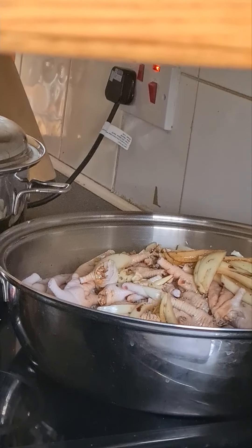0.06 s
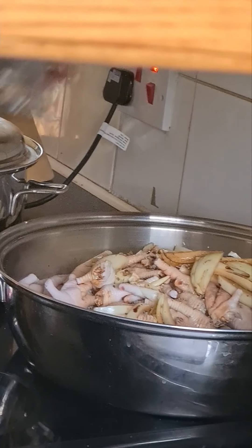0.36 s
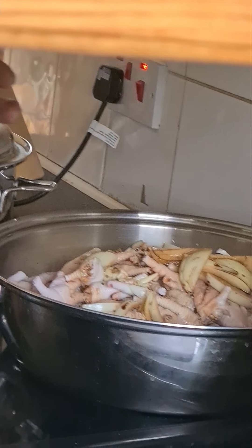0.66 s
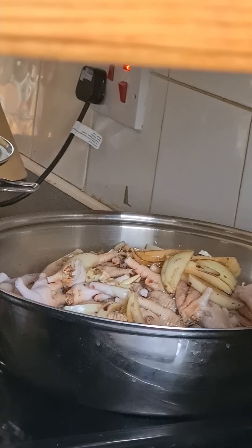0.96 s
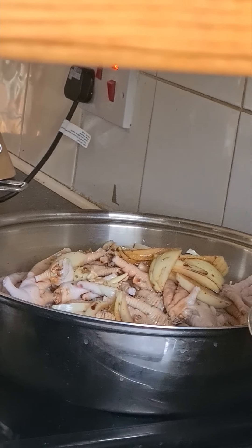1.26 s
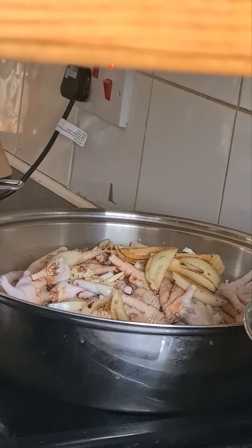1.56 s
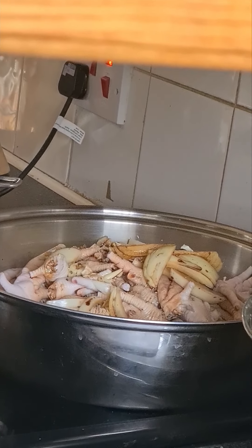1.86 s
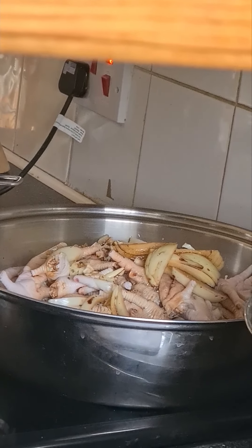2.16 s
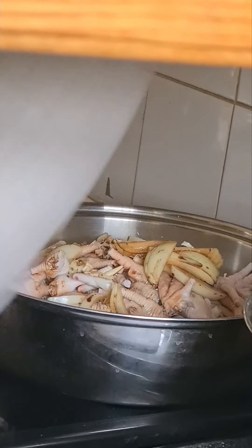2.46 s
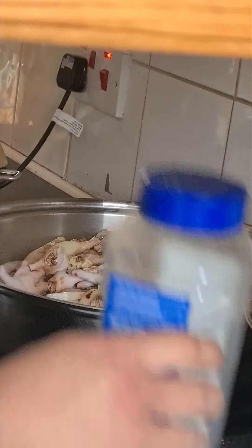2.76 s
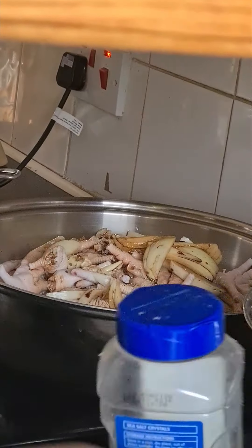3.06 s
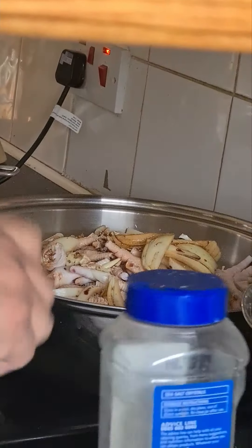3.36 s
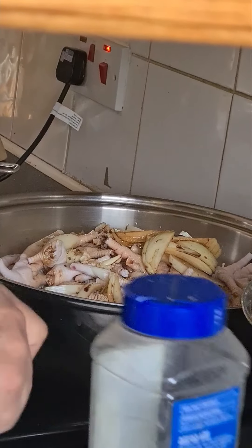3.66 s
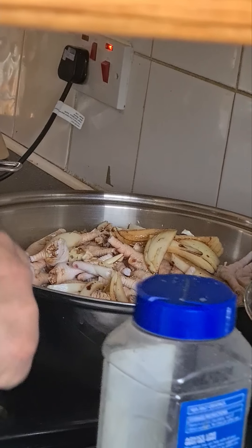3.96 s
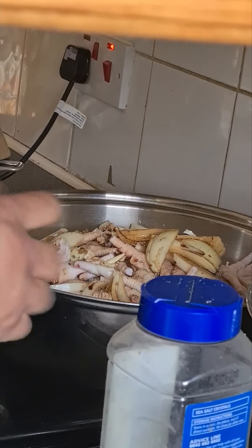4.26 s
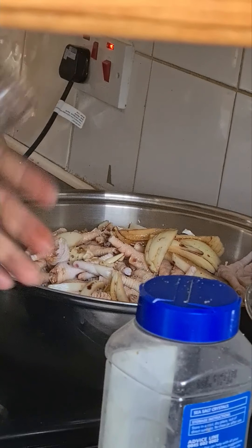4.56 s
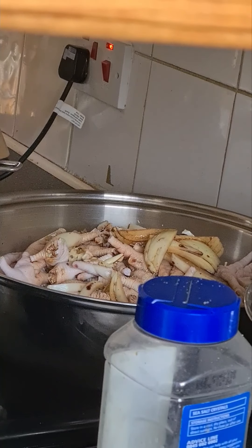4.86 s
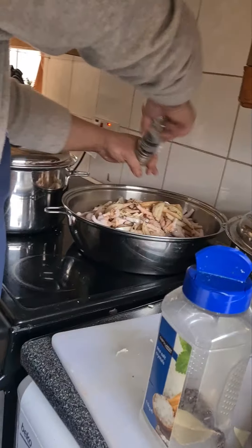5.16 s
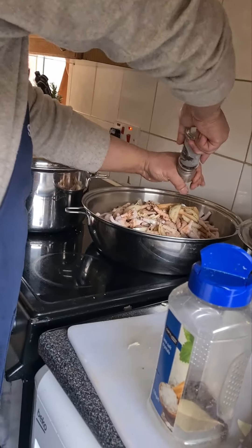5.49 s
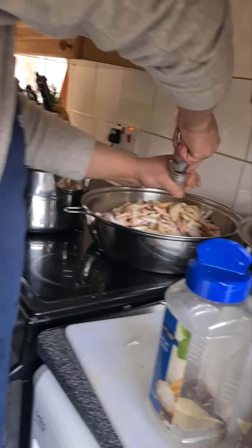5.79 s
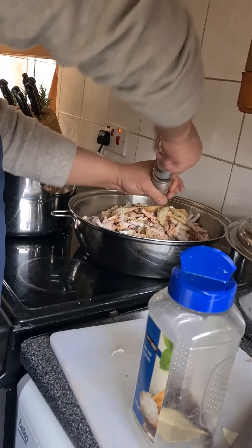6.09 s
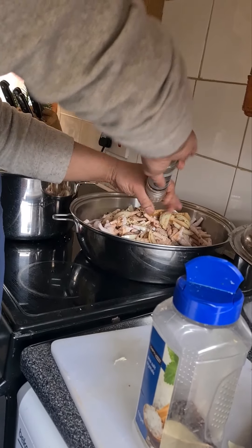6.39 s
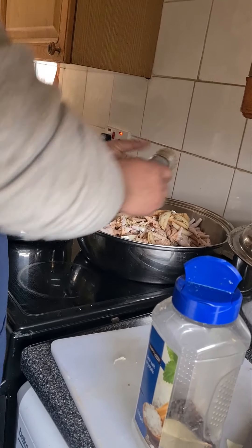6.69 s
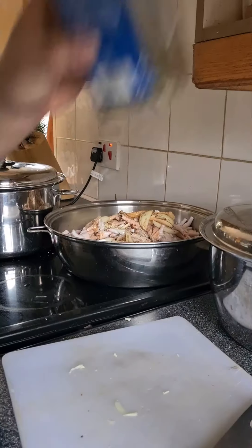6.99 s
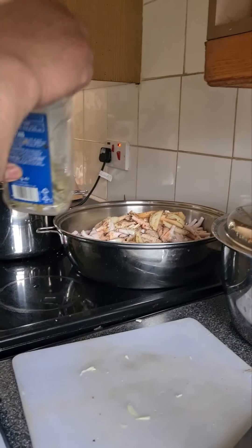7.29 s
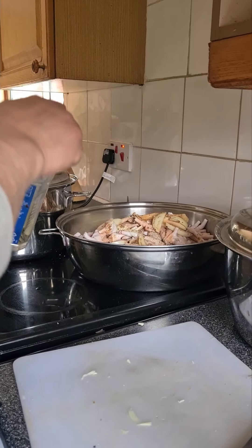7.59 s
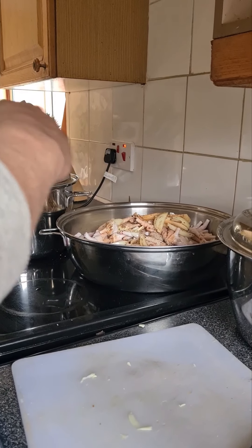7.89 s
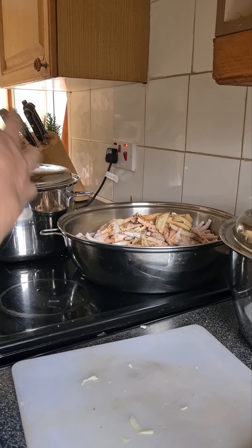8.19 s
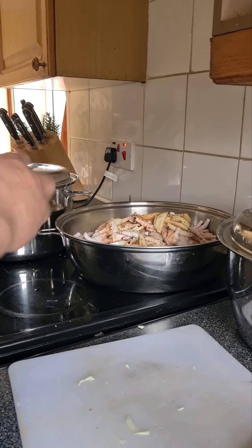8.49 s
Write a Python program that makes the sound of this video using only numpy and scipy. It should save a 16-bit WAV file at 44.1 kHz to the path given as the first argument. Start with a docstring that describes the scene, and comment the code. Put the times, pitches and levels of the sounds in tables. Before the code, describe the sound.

A faint low hum and airy hiss fill a small tiled kitchen. From about 0.7 to 1.4 seconds something is shoved along a shelf, with a hollow, sinking scrape and light bumps; more knocks come near 2.1. Salt then swishes and ticks inside a plastic jar, which lands at 3.1 with a loud thump and a burst of grains, the loudest moment. Smaller knocks follow around 3.4 and 3.9. After a lull and a soft tap, a spice mill crunches in three short, crisp twists at about 5.5, 5.8 and 6.1, while the background bass drops away. Around 6.8 to 7.2 dry herbs slide quietly in a jar with tiny clinks, followed by a faint falling squeak near 7.4. From 7.5 containers rub and knock on the counter, ending in a cluster of sharper clacks around 8.5. Everything sounds close, with a short reverberation.

```python
"""A small tiled kitchen, where food is seasoned over a low hum. Something slides along a shelf by
stick-slip friction. Salt runs in a swung plastic jar, which lands and rocks on a board, each impact
exciting its modes. Grains fracture in three twists of a spice mill, and the background bass drops away.
Dry herbs slide in a tipped jar, a faint squeak follows, and containers rub and knock as they are
put back. Reflections from tiles and cupboards add a short reverberation."""
import sys
import numpy as np
from scipy import signal
from scipy.fft import rfft, irfft
from scipy.io import wavfile

SR = 44100
rng = np.random.default_rng(int(sys.argv[2]) if len(sys.argv) > 2 else 0)


def waveform_to_disk(signal):
    """Save audio, clipped to [-1, 1], as 16-bit WAV at the path in sys.argv[1]."""
    frames = np.transpose(np.atleast_2d(signal))
    scaled = np.clip(frames, -1, 1) * 32767
    samples = np.round(scaled).astype(np.int16)
    wavfile.write(sys.argv[1], SR, samples)


N = 381024
T = np.arange(N) / SR

# Spectra of the background noise. Each row: frequency in Hz, relative density in dB.
AIR_SPECTRUM = [(60, -24.5), (110, -9.5), (200, -10.5), (310, -4), (480, -11), (900, -11.5), (1400, -13),
                (2950, -15), (4500, -24), (5500, -25), (6700, -15), (7800, -24.5), (8800, -36.5),
                (15500, -35.5)]
RUMBLE_SPECTRUM = [(12, -24), (28, -4.5), (52, -4.5), (70, -18), (120, -28.5), (250, -26), (600, -63.5)]
# Partials of an appliance's hum. Each row: frequency in Hz, relative level in dB.
HUM_PARTIALS = [(151.5, -63), (226.5, -81.5), (306, -69), (350, -80), (392, -72)]

# Shoves along the shelf. Each row: start and length in seconds, relative hollow and scratch levels in dB.
SHOVES = [(0.749, 0.076, -44, -52), (0.808, 0.07, -38.5, -41.5), (0.917, 0.063, -36, -43.5),
          (0.967, 0.066, -35, -42.5), (1.038, 0.073, -31.5, -40), (1.155, 0.032, -24, -42),
          (1.199, 0.021, -32.5, -32.5), (1.238, 0.028, -32.5, -47), (1.317, 0.062, -31.5, -43),
          (2.028, 0.12, -50.5, -43)]
# The sinking hollow resonance. Each row: time in seconds, frequency in Hz.
SLIDE_PITCH = [(0.8, 794), (1.054, 786), (1.092, 692), (1.31, 628)]
# Spectra of the sliding friction. Each row: frequency in Hz, relative density in dB.
SLIDE_SPECTRUM = [(35, -70), (60, -8.5), (129, 10), (293, -1), (334, 13), (511, 5), (695, 7), (1000, -6),
                  (1160, 6), (1450, -1), (2000, -6), (2600, -30), (4400, -120)]
SCRATCH_SPECTRUM = [(500, -5), (1300, 7.5), (2700, 5.5), (4200, -3), (6500, -1), (8500, -12),
                    (15000, -23.5)]

# Contacts on the shelf, in handling the salt jar and then the mill, and on the counter.
# Each row: start in seconds, ring peak in dB, contact hardness as a cut-off in Hz,
# relative clack level in dB, clack decay in seconds.
SHELF_KNOCKS = [(0.845, -36, 230, -45, .02), (1.075, -29.5, 330, -26, 0.011),
                (1.336, -30, 1200, -11.5, 0.024), (1.376, -34, 1200, -15, 0.022),
                (1.99, -37, 513, -47, 0.026), (2.017, -34, 607, -47, 0.01), (2.06, -29, 300, -39, 0.039),
                (2.097, -23, 450, -35, 0.037), (2.126, -17.5, 1510, -41, 0.0052)]
HANDLING_CONTACTS = [(3.014, -37, 900, -29.5, 0.11), (3.07, -11, 1500, -5, 0.011),
                     (3.074, -6, 755, -10.5, 0.019), (3.345, -23, 795, -35.5, 0.024),
                     (3.383, -19.5, 580, -25, 0.023), (3.47, -50, 505, -41.5, 0.057),
                     (3.557, -32, 280, -32.5, 0.024), (3.616, -37.5, 398, -45, .01),
                     (3.757, -33.5, 276, -35.5, 0.027), (3.8935, -15.5, 664, -25.5, 0.022),
                     (4.028, -38, 256, -41, 0.0077), (4.098, -33, 710, -43.5, 0.007),
                     (5.215, -46, 650, -41, 0.035)]
COUNTER_KNOCKS = [(7.526, -47, 1000, -45, 0.023), (7.869, -53, 3200, -31, 0.0079),
                  (7.926, -50, 1100, -37.5, 0.028), (7.955, -23.5, 900, -29, 0.0081),
                  (8.086, -44, 900, -44, .006), (8.146, -35, 1190, -35, 0.019),
                  (8.209, -35, 1500, -29, 0.012), (8.222, -33, 1500, -26.5, 0.007),
                  (8.277, -57, 3500, -28.5, 0.0039), (8.463, -35, 1780, -21.5, 0.0052),
                  (8.47, -17, 1890, -15.5, 0.0052), (8.497, -26, 2200, -16, 0.0037),
                  (8.522, -34, 1400, -30, 0.02), (8.552, -25, 700, -28, 0.012),
                  (8.567, -16.5, 1690, -22, 0.014)]
# Modes of the struck bodies. Each row: frequency in Hz, relative level in dB, 60 dB decay time in seconds.
SHELF_MODES = [(91, -31, 0.076), (149, -19, 0.22), (243.6, -8, 0.12), (301, 0.5, 0.074), (343, -15, 0.046),
               (445.6, -10.5, 0.12), (638, -18, 0.097), (823, -9, 0.055), (828, 3, 0.076),
               (1033, -14, 0.21), (1133, -35, 0.33)]
HANDLING_MODES = [(86, -32, 0.25), (170.6, -28.5, 0.24), (239, -17, 0.19), (392, -27.5, 0.021),
                  (414, 2, 0.11), (406, -29, 0.26), (530, -26, 0.048), (787, -8.5, 0.066)]
HERB_JAR_MODES = [(2830, -4, 0.1), (4000, -4, 0.089), (5100, -16, 0.09), (5700, 8, 0.091), (7400, 5, 0.13)]
COUNTER_MODES = [(85.5, -20.5, 0.11), (156, -3.5, 0.032), (289, -8.5, 0.14), (371.6, 9.5, 0.04),
                 (719, 10.5, 0.022), (1117, -4, 0.094), (1359, 8, 0.035), (1514, -5, 0.048),
                 (1860, -7.5, 0.19)]
# Spectra of the contact noise. Each row: frequency in Hz, relative density in dB.
SHELF_CLACK = [(50, -18), (130, -33), (330, -6), (700, 4), (950, -4), (1150, 6.5), (1500, -10.5),
               (3000, -14.5), (7000, -68), (15000, -69)]
HANDLING_CLACK = [(50, -25), (110, -3.5), (190, 2), (450, 1), (800, -2), (1300, -0.5), (2300, -6),
                  (4000, -11.5), (6500, -7), (9000, -21.5), (15000, -37.5)]
COUNTER_CLACK = [(45, -32), (85, -8), (150, -12), (400, 7.5), (800, 3), (1450, 1.5), (2300, 2),
                 (3700, -7.5), (6500, -7), (9000, -16.5), (15000, -28)]

# Surges of salt in the swung jar. Each row: start in seconds, length in seconds, peak level in dB.
SALT_SURGES = [(2.239, 0.16, -29), (2.772, .035, -35.5), (2.99, 0.082, -29.5)]
# Ticks of grains and plastic, and snaps in the mill. Each row: start in seconds, level in dB,
# decay in seconds.
TICKS = [(2.677, -27, 0.0088), (2.718, -28, 0.0039), (2.776, -24.5, 0.031), (2.939, -17.5, 0.0031),
         (3.392, -30, 0.0025), (3.851, -36.5, 0.0083), (3.906, -25.5, 0.0063), (4.365, -42.5, 0.025),
         (5.217, -35.5, 0.023), (6.57, -48, 0.024), (6.708, -41, 0.011)]
MILL_SNAPS = [(5.471, -13.5, 0.0046), (5.615, -21.5, 0.021), (5.773, -14, 0.011), (5.838, -9, 0.0018),
              (5.849, -7, 0.0044), (6.16, -23, 0.0052), (6.432, -31, 0.0042)]
# Strong and faint movements of the mill. Each row: start and length in seconds, relative crush and bite
# levels in dB, fall in dB per second.
TWISTS = [(5.469, 0.029, -26, -21.5, 515.5), (5.763, 0.088, -20, -24, 649), (5.955, 0.04, -42, -53, 140),
          (6.105, 0.069, -25.5, -26, 600), (6.359, 0.076, -43.5, -48, 280)]
# Clinks of the herb jar. Each row: start in seconds, ring peak in dB, relative clack level in dB.
CLINKS = [(6.853, -66, -41), (6.924, -50, -59), (7.025, -54, -54), (7.071, -45, -46), (7.121, -52, -52),
          (7.161, -51, -52)]
# Rubs of moved containers. Each row: start in seconds, length in seconds, relative level in dB.
RUBS = [(7.535, 0.15, -52), (7.767, .17, -47), (8.16, 0.079, -48.5)]

# Spectra of the granular sounds. Each row: frequency in Hz, relative density in dB.
SALT_SPECTRUM = [(180, -45), (300, -5.5), (462, -8), (678, -3), (870, -13), (1120, 1.5), (1580, -7),
                 (1970, -2), (2840, -2), (3890, -4.5), (6300, 0.5), (12300, -18), (16000, -23)]
LANDING_SPECTRUM = [(80, -17), (150, -17.5), (240, 2), (320, -10.5), (440, 8.5), (700, -8), (1000, -5),
                    (1500, -9), (2000, -6.5), (2400, -19), (2900, -5), (4300, -16), (6500, -3),
                    (8500, -10.5), (12000, -13.5), (16000, -21.5)]
TICK_SPECTRUM = [(400, -30.5), (1500, -39.5), (3000, -9), (4300, -14), (5500, -6.5), (6900, 1.5),
                 (8500, -11.5), (11000, -14.5), (16000, -25.5)]
CRUSH_SPECTRUM = [(150, -33), (900, -11), (1250, -14.5), (2200, -13.5), (2900, -21), (3600, -25.5),
                  (5400, -13), (6400, 2), (8500, -2), (10500, -7), (13000, -8.5), (16000, -19)]
BITE_SPECTRUM = [(100, -24), (400, -4.5), (850, -23), (1250, -3), (1650, -6), (2100, -1), (2400, -8),
                 (2900, 1.5), (3600, -10), (5000, -13), (7000, -5), (16000, -30)]
SNAP_SPECTRUM = [(400, -32), (1500, -6), (2900, 5), (3600, -11), (5300, -10), (6500, 18.5), (8500, 6),
                 (11000, -1), (16000, -7.5)]
HERB_SPECTRUM = [(800, -14), (3000, -18), (5500, -18), (7600, -4.5), (9500, -15), (12500, -17),
                 (16000, -28)]
# Resonances of the vessels around the grains. Each row: frequency in Hz, width in Hz, boost in dB.
SALT_JAR_PEAKS = [(1790, 110, 13.5), (2080, 300, 10.5), (3760, 300, 11), (5070, 240, 8.5), (6040, 250, 5)]
MILL_PEAKS = [(1190, 220, 10), (2700, 150, 14), (3020, 140, 9.5), (6030, 500, 6), (7440, 133, 7),
              (8800, 82, 9.5)]
HERB_JAR_PEAKS = [(6760, 220, 7), (7570, 320, 7.5), (12800, 510, 3)]

# Likeness of the two channels. Each row: frequency in Hz, coherence from 0 to 1.
COHERENCE = [(30, 0.88), (200, 0.86), (450, 0.57), (900, 0.5), (1800, 0), (3000, 0.07), (16000, 0.027)]
# Reverberation time. Each row: frequency in Hz, 60 dB decay time in seconds.
ROOM_T60 = [(100, 0.2), (500, 0.2968), (2000, 0.32), (6000, 0.3568), (14000, 0.29)]
# Colour of the reverberation. Each row: frequency in Hz, gain in dB.
ROOM_SPECTRUM = [(100, 8), (450, 0), (1200, 2.5), (4000, 2.5), (14000, -0.5)]


def amp(db):
    """Amplitude ratio of a level in decibels."""
    return 10 ** (np.asarray(db) / 20)


def unit_rms(x):
    """Normalisation to an rms of 1."""
    return x / np.sqrt(np.mean(x ** 2) + 1e-20)


def curve_at(points, hz):
    """Interpolation on a logarithmic frequency axis."""
    f, value = np.transpose(points)
    return np.interp(np.log(hz + 1), np.log(f + 1), value)


def drift(per_s):
    """Random modulation of rms 1, linear between knots."""
    knots = np.arange(0, T[-1] + 1, 1 / per_s)
    return unit_rms(np.interp(T, knots, rng.standard_normal(N)[:len(knots)]))


def stereo_noise(size, envelope=1):
    """Partial coherence: two independent noises are cross-mixed to be alike in the bass only."""
    hz = np.fft.rfftfreq(size, 1 / SR)
    angle = np.arcsin(np.clip(curve_at(COHERENCE, hz), 0, 1)) / 2
    spectra = rfft(envelope * rng.standard_normal((2, size)))
    return irfft(np.cos(angle) * spectra + np.sin(angle) * spectra[::-1])


def colour(x, spectrum, peaks=(), size=4096):
    """Minimum-phase filtering by a broad spectrum with resonance peaks on it."""
    hz = abs(np.fft.fftfreq(size, 1 / SR))
    boost_db = sum(db / (1 + (2 * (hz - centre) / width) ** 2) for centre, width, db in peaks)
    log_gain = np.log(amp(curve_at(spectrum, hz) + boost_db))
    taps = np.fft.ifft(np.exp(np.conj(signal.hilbert(log_gain)))).real
    return signal.oaconvolve(x, taps[None, :size // 2], axes=1)[:, :x.shape[1]]


def smear(x):
    """Group delay: nearby reflections hold back each treble frequency by up to 4 ms."""
    hz = np.fft.rfftfreq(N, 1 / SR)
    knots_hz = np.arange(0, SR, 250)
    share = np.array([np.interp(hz, knots_hz, row) for row in rng.random((2, len(knots_hz)))])
    delay_s = share * np.interp(hz, [1200, 3500], [0, .004])
    return irfft(rfft(x) * np.exp(-2j * np.pi * np.cumsum(delay_s, axis=1) * SR / N))


def grains(per_s, spread_db):
    """Shot noise: tiny impacts of uneven strength arrive at random."""
    strength = amp(spread_db * np.minimum(rng.exponential(1, N), 4))
    arrivals = rng.random(N) < per_s / SR
    return unit_rms(smear(stereo_noise(N, strength * arrivals)))


def stroke(start, length, peak_db, attack_s, build_db_s, fall_db_s):
    """Exponential growth and decay, in dB per second, about a peak at the end of a movement."""
    t = T - start
    below_db = build_db_s * np.maximum(length - t, 0) + fall_db_s * np.maximum(t - length, 0)
    return np.clip(t / attack_s, 0, 1) * amp(peak_db - np.clip(below_db, 0, 200))


def clack(decay_s, spectrum, rise_s=0, peaks=(), size=8192):
    """Rough contact: a dying burst of micro-impacts is filtered by the struck body."""
    t = np.arange(size) / SR
    onset = 1 - np.exp(-(t / (0.1 * decay_s + 0.41 * rise_s)) ** 2)
    burst = colour(stereo_noise(size) * onset * np.exp(-t / decay_s), spectrum, peaks)
    return 0.41 * burst * np.sqrt(decay_s * SR / np.sum(burst ** 2))  # peaks near 1


def add(mix, start, sound):
    """Superposition of a sound on the mix from a start in seconds."""
    part = mix[:, round(start * SR):][:, :sound.shape[-1]]
    part += sound[..., :part.shape[1]]


def knocks(rows, modes, spectrum, body_width_hz=60, body_db=4, rise_cycles=4.3):
    """Modal vibration: each contact clacks and excites damped modes; soft ones swell and ring low."""
    out, t = np.zeros((2, N)), np.arange(SR // 2) / SR
    body = [(hz, body_width_hz, body_db) for hz, _, _ in modes]
    for start, ring_db, cutoff_hz, clack_db, decay_s in rows:
        rise_s = rise_cycles / cutoff_hz
        detunes = 1 + 0.023 * rng.standard_normal(len(modes))  # the grip changes from touch to touch
        ring = np.zeros_like(t)
        for (hz, db, t60), detune in zip(modes, detunes):
            envelope = amp(db - 60 * t / t60) / np.hypot(1, (hz / cutoff_hz) ** 3)
            ring += envelope * np.sin(2 * np.pi * hz * detune * t)
        ring *= 1 - np.exp(-(t / rise_s) ** 2)
        add(out, start, amp(ring_db) * ring / abs(ring).max())
        add(out, start, amp(clack_db + body_db / 2) * clack(decay_s, spectrum, rise_s, body))
    return out


def hum_tone(hz, phase_rad, phase_per_s, level_db, level_per_s):
    """Random phase and amplitude modulation make a sinusoid waver."""
    tone = np.sin(2 * np.pi * hz * T + phase_rad * drift(phase_per_s))
    return unit_rms(tone * amp(level_db * drift(level_per_s)))


def background(air_db=-56.5, rumble_db=-57, drop_at_s=5.46, drop_takes_s=0.099):
    """Air noise, hum and rumble superpose; part-way through they drop, the rumble most."""
    dropped = np.clip((T - drop_at_s) / drop_takes_s, 0, 1)
    air = unit_rms(colour(stereo_noise(N), AIR_SPECTRUM)) * amp(air_db + 1.3 * drift(7))
    rumble = unit_rms(colour(stereo_noise(N), RUMBLE_SPECTRUM, size=16384))
    mains = amp(-4) * hum_tone(52, 2.7, 7.1, 2.5, 3.82)
    hum = sum(amp(db) * hum_tone(hz, 2.07, 6.4, 2, 1.89) for hz, db in HUM_PARTIALS)
    bass = (rumble + mains) * amp(rumble_db - 16 * dropped)
    return air * amp(-2 * dropped) + hum * amp(1.5 - 5 * dropped) + bass


def resonate(x, hz, width_hz):
    """A swept resonance of unit gain follows the curve hz."""
    carrier = np.exp(2j * np.pi * np.cumsum(hz) / SR)
    pole = np.exp(-np.pi * width_hz / SR)
    return 2 * (carrier * signal.lfilter([1 - pole], [1, -pole], x / carrier)).real


def shelf_slide(width_hz=60):
    """Stick-slip friction excites a sinking hollow resonance as an object is shoved along and bumps."""
    slips = grains(1500, 3)
    hz = np.interp(T, *np.transpose(SLIDE_PITCH))
    hollow = unit_rms(resonate(resonate(slips, hz, width_hz), hz, 4 * width_hz))
    body = unit_rms(colour(slips, SLIDE_SPECTRUM, peaks=[(1160, 89, 4.3)]))
    scratch = unit_rms(colour(grains(3300, 1.4), SCRATCH_SPECTRUM))
    push, scrape = np.zeros(N), np.zeros(N)
    for start, length, hollow_db, scratch_db in SHOVES:
        shove = stroke(start, length, 0, attack_s=0.0096, build_db_s=40, fall_db_s=212)
        push = np.maximum(push, amp(hollow_db) * shove)
        scrape = np.maximum(scrape, amp(scratch_db) * shove)
    slide = push * (amp(-2) * hollow + amp(-5) * body) + amp(-1) * scrape * scratch
    return slide + knocks(SHELF_KNOCKS, SHELF_MODES, SHELF_CLACK)


def salt(attack_s=.004, fall_db_s=172.5):
    """Granular flow: crystals run along the swung jar, then leap and strike its wall as it lands."""
    surges = sum(stroke(*row, attack_s, build_db_s=211.5, fall_db_s=fall_db_s) for row in SALT_SURGES)
    trickle = stroke(2.44, 0.42, -44.5, attack_s, build_db_s=0, fall_db_s=fall_db_s)
    leap = stroke(3.07, 0.038, -11.5, attack_s, build_db_s=402.5, fall_db_s=291)
    run = unit_rms(colour(grains(7000, 1), SALT_SPECTRUM)) * np.hypot(surges, trickle)
    landing = unit_rms(colour(grains(9000, 1.42), LANDING_SPECTRUM, SALT_JAR_PEAKS)) * leap
    return run + landing


def ticks(rows, spectrum):
    """Brief transients: single hard grains and snaps of plastic radiate broadband clicks."""
    out = np.zeros((2, N))
    for start, db, decay_s in rows:
        add(out, start, amp(db) * clack(decay_s, spectrum))
    return out


def jar_and_mill_handling():
    """Contact excitation: the salt jar rubs, lands and rocks; then a soft knock as the mill is picked up."""
    return knocks(HANDLING_CONTACTS, HANDLING_MODES, HANDLING_CLACK)


def spice_mill(catch_s=0.0024, bite_lead_s=0.012, clump_db=5):
    """Brittle fracture: grains crack in clumps; the burrs' bite shakes the hollow body just before."""
    crush, bite = np.zeros(N), np.zeros(N)
    for start, length, crush_db, bite_db, fall in TWISTS:
        crush += stroke(start, length, crush_db, catch_s, build_db_s=138, fall_db_s=fall)
        bite += stroke(start, length - bite_lead_s, bite_db, catch_s, build_db_s=204, fall_db_s=fall)
    cracks = grains(3000, 3.4) * amp(clump_db * drift(160))
    crisp = unit_rms(colour(cracks, CRUSH_SPECTRUM, MILL_PEAKS)) * crush
    hollow = unit_rms(colour(grains(3000, 3), BITE_SPECTRUM, MILL_PEAKS)) * bite
    return amp(-2.5) * (crisp + hollow) + ticks(MILL_SNAPS, SNAP_SPECTRUM)


def herb_jar(clump_db=0.5, cutoff_hz=4500, decay_s=0.0085):
    """Granular flow: dry flakes slide in the tipped jar, and light touches excite its modes."""
    tipping = stroke(6.74, .44, -48, attack_s=0.044, build_db_s=29, fall_db_s=195)
    flakes = grains(1500, 1) * amp(clump_db * drift(45))
    rustle = unit_rms(colour(flakes, HERB_SPECTRUM, HERB_JAR_PEAKS)) * tipping
    touches = [(start, ring_db, cutoff_hz, clack_db, decay_s) for start, ring_db, clack_db in CLINKS]
    return rustle + knocks(touches, HERB_JAR_MODES, TICK_SPECTRUM)


def squeak(start=7.305, length=0.19, start_hz=625, sag_hz_per_s=310, flutter_db=2):
    """Frequency and amplitude modulation: one faint note swells, flutters and sags in pitch."""
    hz = start_hz - sag_hz_per_s * np.clip(T - start, 0, length)
    hz *= 1 + 0.0081 * drift(90)
    swell = stroke(start, length, -48.5, attack_s=0.028, build_db_s=65, fall_db_s=397)
    return np.sin(2 * np.pi * np.cumsum(hz) / SR) * swell * amp(flutter_db * drift(35))


def container_knocks():
    """Impact excitation: containers ring as they are put back on the counter."""
    return knocks(COUNTER_KNOCKS, COUNTER_MODES, COUNTER_CLACK)


def container_rubs():
    """Sliding friction: moved containers make a stream of tiny contacts."""
    moving = sum(stroke(*row, attack_s=.015, build_db_s=17, fall_db_s=260.5) for row in RUBS)
    return amp(-6) * unit_rms(colour(grains(900, 2.1), COUNTER_CLACK)) * moving


def reverberation(x, size=24576):
    """A diffuse field: dense reflections from tiles and cupboards decay at each band's own rate."""
    hz, t, bands = signal.stft(stereo_noise(size), SR, nperseg=256)
    decay = amp(-60 * t / curve_at(ROOM_T60, hz)[:, None])
    tail = signal.istft(bands * decay, SR, nperseg=256)[1]
    tail *= np.clip(np.arange(tail.shape[1]) / SR / 0.0023 - .5, 0, 1)  # the nearest wall answers in 2 ms
    tail = colour(tail / np.linalg.norm(tail[0]), ROOM_SPECTRUM)
    return signal.fftconvolve(x, tail, axes=1)[:, :N]


def scene():
    """Direct and reverberant sound superpose; a level difference leans most sources' treble right."""
    # Each row: sound, left minus right in the treble in dB, gain into the room in dB.
    sources = [(shelf_slide(), -4, -6), (salt(), -4.5, -6), (ticks(TICKS, TICK_SPECTRUM), -3, -3),
               (jar_and_mill_handling(), -5, -7), (spice_mill(), -1.5, -4), (herb_jar(), 0, -6),
               (squeak(), 0, -6), (container_knocks(), -3, -5), (container_rubs(), 0, -6)]
    hz = np.fft.rfftfreq(N, 1 / SR)
    shadow = curve_at([(200, 0.077), (1000, 0.39), (3500, 0.055), (6000, 1)], hz)
    direct, sent = np.zeros((2, N)), np.zeros((2, N))
    for sound, lean_db, room_db in sources:
        placed = irfft(rfft(sound) * amp(shadow * [[lean_db / 2], [-lean_db / 2]]))
        direct += placed
        sent += amp(room_db) * placed
    return direct + reverberation(sent) + background()


def record(dry, ceiling=.85, cutoff_hz=15900):
    """Hard clipping limits the peaks, and a low-pass filter limits the band."""
    lowpass = signal.firwin(511, cutoff_hz, window=("kaiser", 9), fs=SR)
    return signal.oaconvolve(np.clip(dry, -ceiling, ceiling), lowpass[None], "same")


dry = scene()
out = record(dry)
waveform_to_disk(out)
```